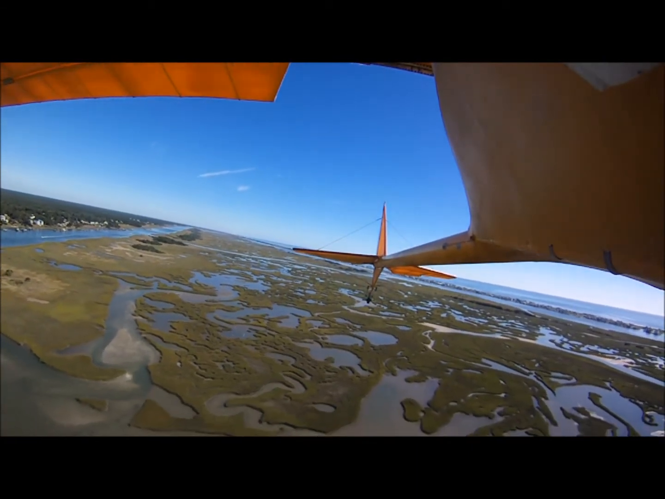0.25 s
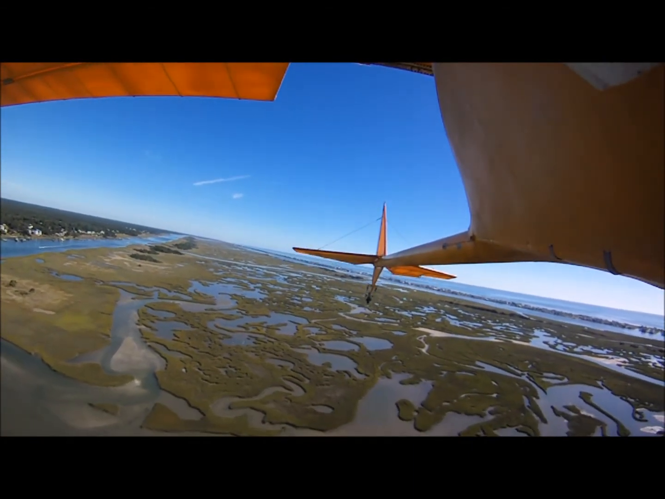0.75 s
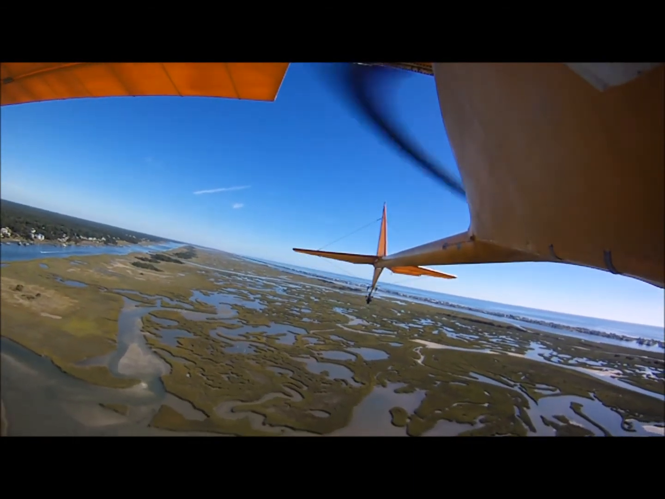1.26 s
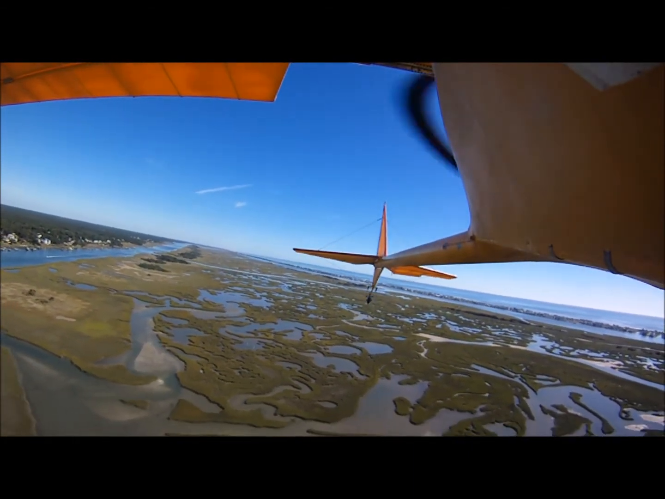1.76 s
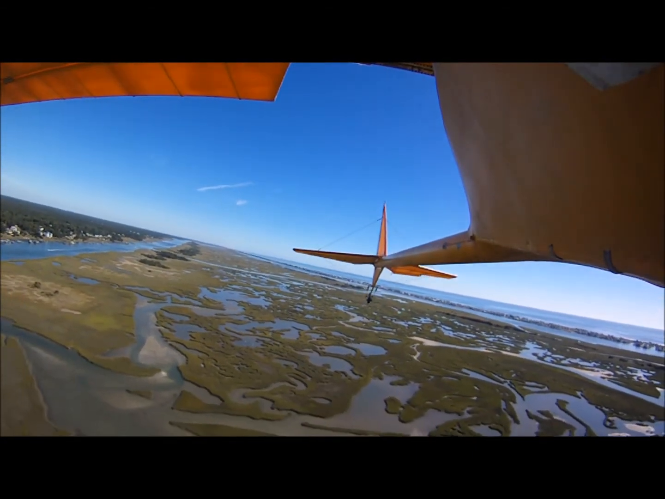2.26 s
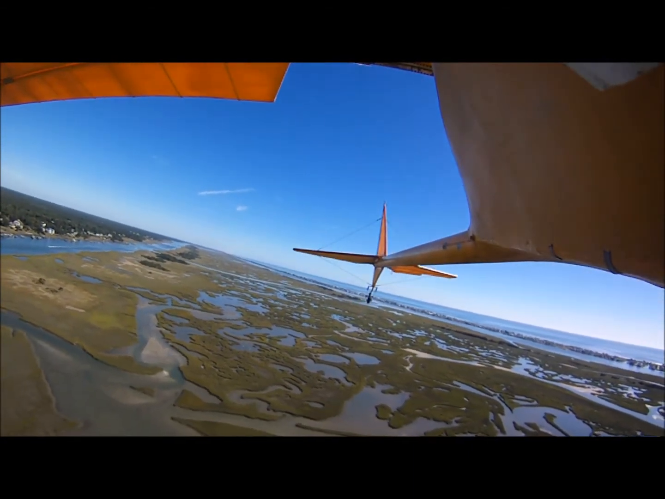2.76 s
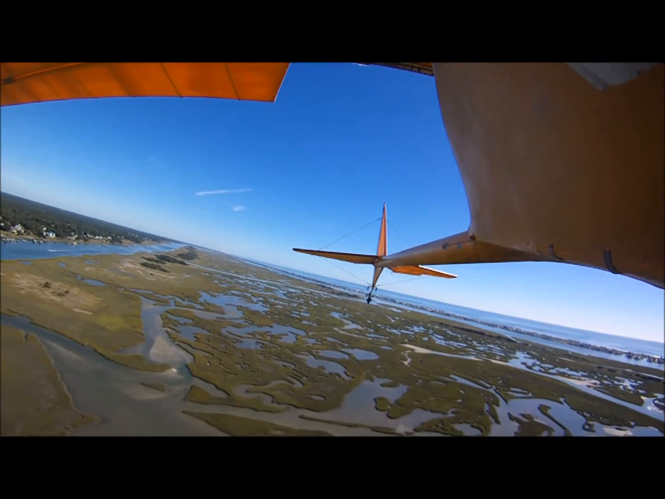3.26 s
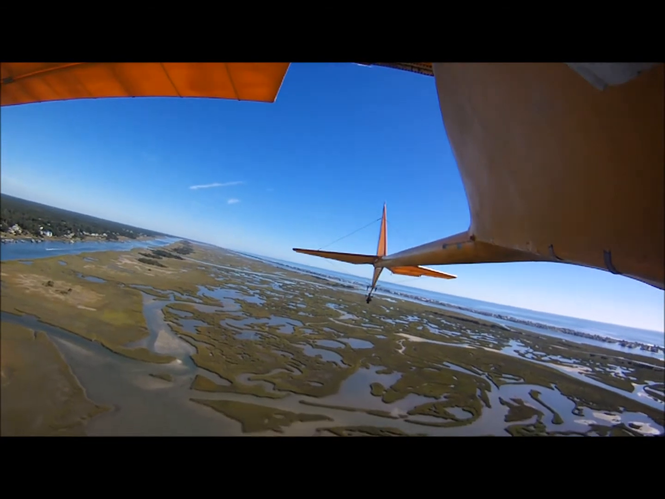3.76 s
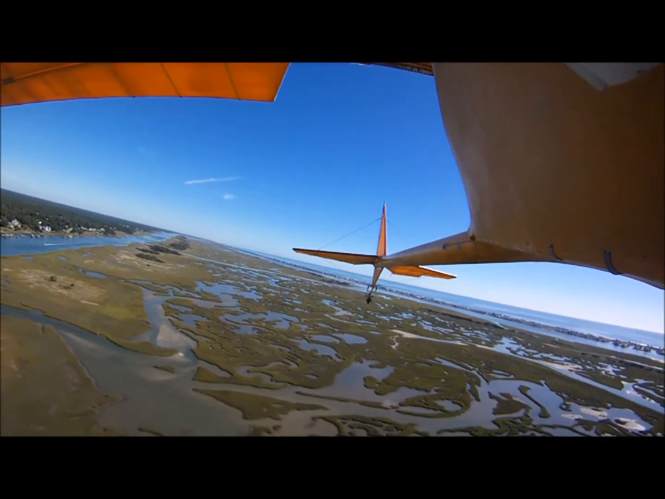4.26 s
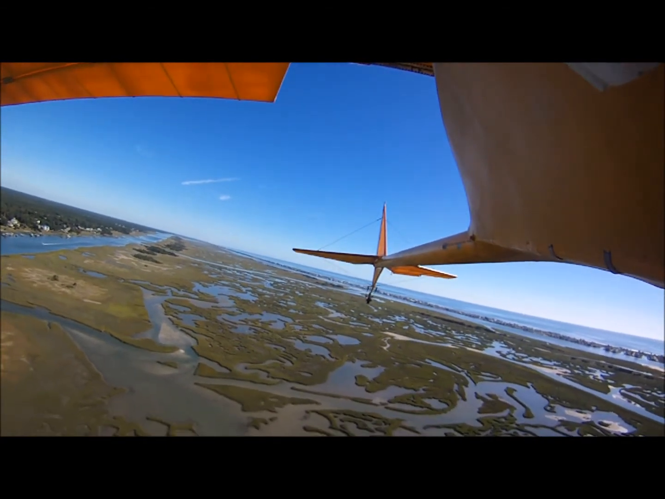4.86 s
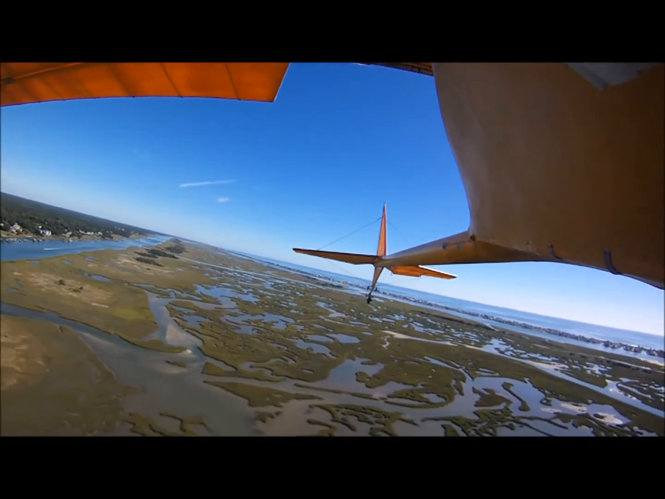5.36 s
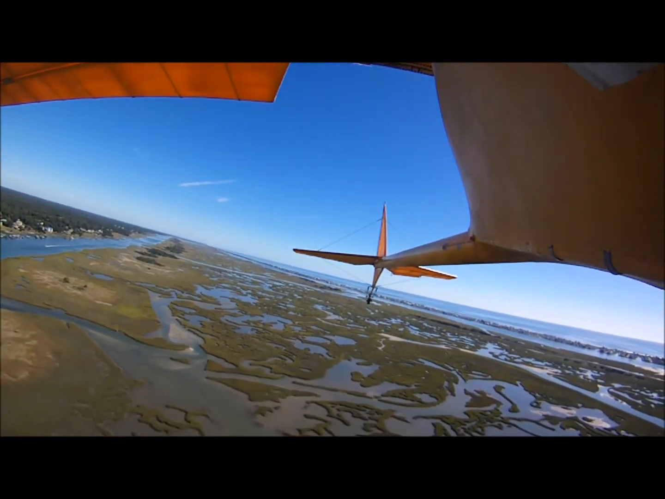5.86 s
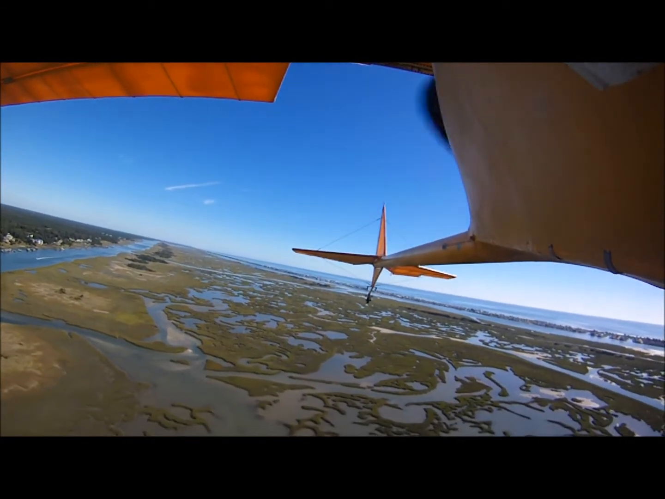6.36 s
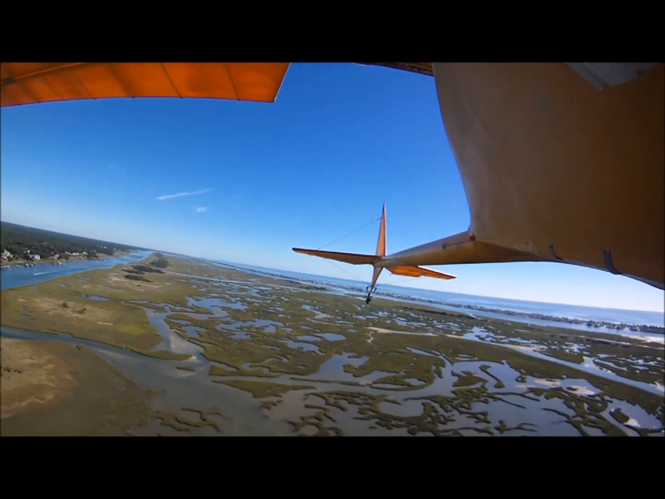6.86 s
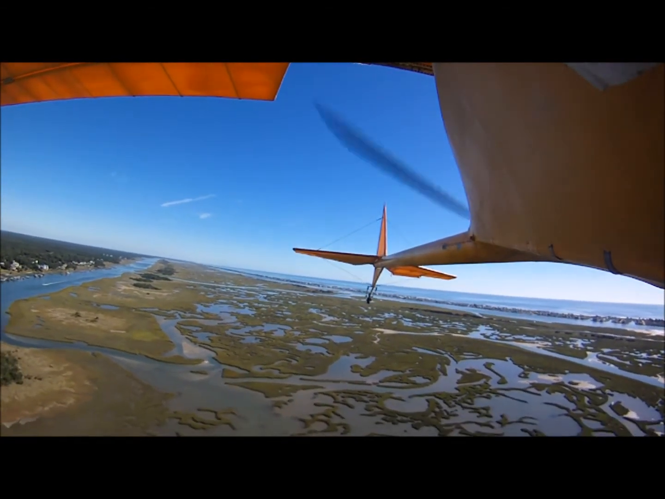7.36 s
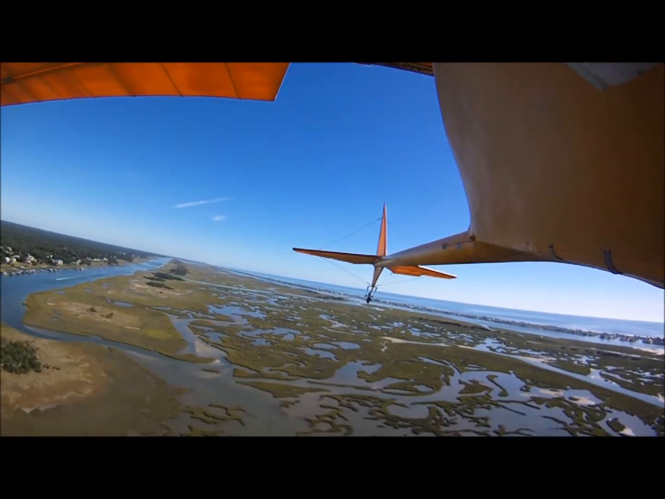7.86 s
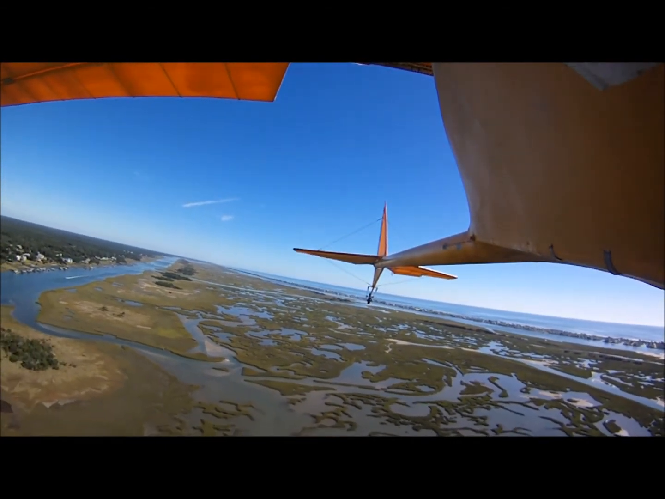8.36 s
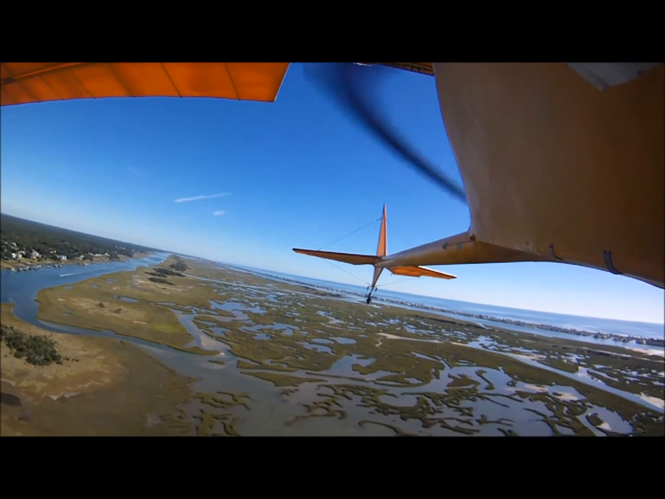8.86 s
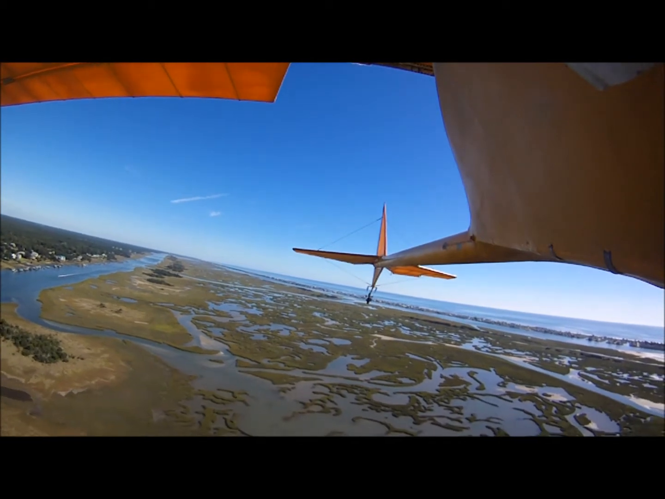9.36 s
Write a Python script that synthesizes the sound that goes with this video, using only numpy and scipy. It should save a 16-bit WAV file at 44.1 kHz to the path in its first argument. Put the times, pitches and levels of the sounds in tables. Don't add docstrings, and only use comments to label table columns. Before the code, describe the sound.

A small pusher-propeller aircraft cruises over open marshland, heard from a microphone fixed outside on the airframe, close and dry with no echo. From 0 to about 9.6 seconds the drone is continuous: about 72 blade slaps a second fuse into a low, raspy buzz, strongest around 290 to 360 hertz, beating roughly with a geared two-stroke exhaust. Its pitch wavers only minutely. An equally prominent broad slipstream roar is chopped by each blade, with a quiet, fluttering tip hiss above. Short gusts puff near 1.6, 3.15, 4.7, 5.6, 6.2, 7.2 and 8.8 seconds. Tiny dry ticks scatter throughout, clustering around 2.4 to 2.9 and 7.1 to 7.5, with sharper ones near 5.6 and 8.8. Airflow is calmest around 1 to 1.4 seconds, then gradually strengthens unevenly, peaking near 7.2 and rising again at the end. The sound stops abruptly, still in flight.

```python
import sys
import numpy as np
from scipy import signal
from scipy.fft import rfft, irfft
from scipy.io import wavfile
from scipy.ndimage import uniform_filter1d

SR = 44100
rng = np.random.default_rng(int(sys.argv[2]) if len(sys.argv) > 2 else 0)


def ratio(d):
    e = np.asarray(d, float) / 20
    return 10 ** e


def waveform_to_disk(signal):
    frames = np.transpose(np.atleast_2d(signal))
    scaled = np.clip(frames, -1, 1) * 32767
    samples = np.round(scaled).astype(np.int16)
    wavfile.write(sys.argv[1], SR, samples)


N = 424683

# (time [s], blade passes per second [Hz])
BLADE_RATE = [(0, 72.27), (.9, 72.58), (1.2, 72.36), (1.45, 71.93), (2.1, 72.4), (2.5, 72.4), (2.8, 71.96),
              (3.35, 71.7), (3.9, 72.27), (4.3, 72.73), (5.0, 72.41), (5.65, 72.57), (6.05, 72.38),
              (6.75, 72.74), (7.6, 72.81), (8.7, 72.49), (9.3, 72.63), (9.63, 72.27)]
# (time [s], change [dB])
BLADE_LOAD = [(0, 1.5), (.9, -1.5), (1.9, 1), (2.6, -3), (3.0, 1), (3.3, 1), (3.75, 1.4), (5.1, 1),
              (6.3, 2), (7.2, 1.5), (7.5, 0.5), (8.1, 1.8), (8.4, 0), (8.8, 0.5), (9.63, 1.5)]
# (multiple of the blade rate [-], rms level [dB])
SLAP_HARMONICS = [(1, -46.6), (2, -36.1), (3, -36.6), (4, -29.1), (5, -29.7), (6, -43.7), (7, -33.1),
                  (8, -34.8), (9, -42.7), (10, -43.2), (11, -44.4), (12, -39.2), (13, -45.1), (14, -39.0),
                  (15, -45.3), (16, -39.5), (17, -46.9), (18, -42.6), (19, -50.7), (20, -46.1), (21, -48.5),
                  (22, -59.3), (23, -46.5), (24, -54.8), (25, -54.8), (26, -70.0), (27, -55.5), (28, -57.7),
                  (29, -54.1), (30, -53.2), (31, -58.8), (32, -59.4)]
# (multiple of the crank rate [-], rms level [dB])
EXHAUST_HARMONICS = [(1, -57), (2, -34), (3, -53), (4, -31), (6, -39), (8, -43), (9, -50), (10, -48),
                     (12, -53), (15, -49), (16, -52)]
# (time [s], level over calm air [dB])
AIRFLOW = [(0, 0.3), (.9, -0.25), (1.43, -.3), (1.65, 0.4), (2.2, 0.4), (2.85, 1.6), (3.3, -0.1),
           (3.9, 0.65), (4.9, 1.7), (5.5, 1.7), (5.94, 1.2), (6.25, 2.5), (6.5, 1.3), (7.2, 3.5),
           (7.75, 1.9), (8.25, 2.5), (8.55, 1.25), (9.63, 3)]
# (frequency [Hz], density [dB per Hz])
ROAR_COLOUR = [(20, -31), (60, -19), (100, -5.5), (200, -3), (400, -1), (800, 0), (1500, -3), (2200, -8.5),
               (3000, -19), (4500, -33), (7000, -40), (15000, -75)]
# (time [s], rise [dB], length [s])
GUSTS = [
    (1.6, 4, 0.04),
    (3.15, 3, .04),
    (4.6, 2.5, .01),
    (4.72, 4, .03),
    (5.613, 3.5, .03),
    (6.2, 2, .05),
    (7.17, 3.5, 0.062),
    (8.82, 2.5, 0.033),
]
# (frequency [Hz], density [dB per Hz])
FIZZ_COLOUR = [(1500, -7), (3000, -2.5), (4500, 0), (7000, -9.5), (9500, -12), (11000, -17), (12500, -21),
               (13800, -19.5), (15200, -29)]
# (frequency [Hz], density [dB per Hz])
SNAP_COLOUR = [(5000, -25), (7500, -6), (9200, 4), (10500, -6), (12000, -17), (14000, -30)]
# (time [s], level at 5 kHz [dB per kHz], slope [dB per octave])
PORT_TICKS = [(1.5966, -47, -17), (1.6742, -48, -10), (2.43, -42, -12), (2.4618, -50, -18),
              (2.4675, -42.5, -20), (2.7896, -47.5, -19), (2.8036, -48, -20), (2.894, -46.5, -15),
              (2.9314, -47.5, -19), (3.3551, -48.5, -16), (4.7266, -43.5, -20), (5.6063, -39.5, -10),
              (6.0142, -47.5, -20), (6.1542, -48.5, -20), (6.1947, -46, -10), (7.1144, -45.5, -20),
              (7.1192, -47.5, -7), (7.1689, -48, -19), (7.2394, -46.5, -15), (7.3645, -47.5, -9),
              (7.4514, -46, -17), (7.5234, -43, -20), (8.1757, -46, -20), (8.1949, -45.5, -15),
              (8.2308, -48.5, -14), (8.3127, -47, -16), (8.8061, -37, -11), (9.0521, -45.5, -15),
              (9.6126, -46.5, -9)]

GEAR = 49 / 19
SLAP_TURN = .127
FIRING_TURN = .19
BODY_DB, UPPER_DB, FIZZ_DB = -29, -28.5, -52
BODY_FOLLOWS, UPPER_FOLLOWS, FIZZ_FOLLOWS = 0.89, 0.71, 0.77


def evened(x):
    return x / np.sqrt(np.mean(x ** 2) + 1e-20)


def curve(rows):
    rows = np.array(rows)
    return np.interp(np.arange(N) / SR, rows[:, 0], rows[:, 1])


def drift(top_hz, count=24):
    t = np.arange(0, N + 256, 256) / SR
    hz = top_hz * np.geomspace(1 / 20, 1, count)[:, None]
    sines = np.sin(2 * np.pi * (hz * t + rng.random((count, 1))))
    slow = (sines / np.sqrt(hz)).sum(0)
    return np.interp(np.arange(N) / SR, t, evened(slow))


def noise(colour, patchy_db, flicker_db, size):
    frames = 4 * N // size + 5
    hz = np.fft.rfftfreq(size, 1 / SR)
    real, imag, patches = rng.standard_normal((frames, len(hz), 3)).T
    patches = uniform_filter1d(patches, size=9, axis=0)
    patches = evened(uniform_filter1d(patches, size=7, axis=1))
    flicker = evened(uniform_filter1d(rng.standard_normal(frames), size=3))
    reach = 1 / (1 + (hz[:, None] / 10000) ** 4)
    point_hz, point_db = np.transpose(colour)
    colour_db = np.interp(np.log(hz + 1), np.log(point_hz), point_db, left=-90)[:, None]
    level_db = colour_db + patchy_db * patches + flicker_db * flicker * reach
    spectra = (real + 1j * imag) * ratio(level_db)
    return evened(signal.istft(spectra, nperseg=size, noverlap=3 * size // 4)[1][:N])


def shaft_harmonics(table, turns, waver_db, jitter, causal, lag, lean_db={}):
    multiples, levels_db = np.transpose(table)
    count = int(multiples.max()) + 2
    log_level = np.interp(np.arange(count + 1), multiples, levels_db) * np.log(10) / 20
    mirrored = np.r_[log_level, log_level[-2:0:-1]]
    phases = -causal * signal.hilbert(mirrored).imag[multiples.astype(int)] - lag
    turns = turns + jitter * drift(30)
    out = np.zeros(N)
    for k, db, phase in zip(multiples, levels_db, phases):
        change_db = lean_db[k] if k in lean_db else waver_db * drift(3)
        out += np.sqrt(2) * ratio(db + change_db) * np.cos(2 * np.pi * k * turns + phase)
    return out


def blade_slap(passes):
    lean_db = {}
    for k, lift_db in ((5, 0), (7, 0), (8, .3)):
        lean_db[k] = lift_db + .9 * drift(2)
    lean_db[4] = curve(BLADE_LOAD) - .5 + .9 * drift(6)
    return shaft_harmonics(SLAP_HARMONICS, passes, waver_db=1, jitter=.001, causal=1, lag=1.3, lean_db=lean_db)


def exhaust(passes):
    crank_turns = passes * GEAR / 2 + FIRING_TURN
    return shaft_harmonics(EXHAUST_HARMONICS, crank_turns, waver_db=.6, jitter=.003, causal=0, lag=.65)


def slipstream_roar(passes, chop=.2, lag=.35, puff=.1, split_hz=700):
    swell = chop * np.exp(9 * (np.cos(2 * np.pi * (passes - lag)) - 1))
    slap_puff = puff * np.exp(-((passes - .04) % 1) / .08)
    wake = 1 + swell + slap_puff
    turbulence = noise(ROAR_COLOUR, patchy_db=.5, flicker_db=0.8, size=1024)
    air = ratio(0.15 * drift(14)) * wake * turbulence
    body = signal.sosfiltfilt(signal.butter(2, split_hz, fs=SR, output="sos"), air)
    upper = air - body
    t = np.arange(N) / SR
    gust_db = sum(rise_db * np.exp(-((t - s) / length) ** 2) for s, rise_db, length in GUSTS)
    flow_db = curve(AIRFLOW)
    body_gain = ratio(BODY_DB + BODY_FOLLOWS * flow_db + gust_db)
    upper_gain = ratio(UPPER_DB + UPPER_FOLLOWS * flow_db + 0.2 * gust_db)
    return body_gain * evened(body) + upper_gain * evened(upper)


def tip_fizz(passes, snap_db=-3, early=.045, fade=.07, spread_db=1.3):
    passes = passes + early
    strengths = ratio(spread_db * rng.standard_normal(int(passes[-1]) + 2))
    strength = strengths[np.floor(passes).astype(int) + 1]
    since_snap = passes % 1
    gate = strength * (np.exp(-since_snap / fade) + 0.25 * (1 - since_snap))
    snap = ratio(snap_db) * gate * noise(SNAP_COLOUR, patchy_db=1.2, flicker_db=-1.5, size=256)
    hiss = noise(FIZZ_COLOUR, patchy_db=1.0, flicker_db=3.0, size=256)
    return ratio(FIZZ_DB + FIZZ_FOLLOWS * curve(AIRFLOW)) * (hiss + snap)


def faint_ticks(count=15, level_db=-50, slopes_db=(-20, -12)):
    odds = np.cumsum(ratio(2 * curve(AIRFLOW)))
    when, dullness = rng.random((count, 2)).T
    times = np.interp(when, odds / odds[-1], np.arange(N) / SR).clip(.01)
    slopes = np.interp(dullness, (0, 1), slopes_db)
    return [(s, level_db, slope_db) for s, slope_db in zip(times, slopes)]


def port_ticks(lead=60):
    out = np.zeros(N)
    t = np.arange(512) / SR
    hz = np.fft.rfftfreq(len(t), 1 / SR) + 1
    low_cut = 1 / np.sqrt(1 + (3000 / hz) ** 10)
    high_cut = 1 / np.sqrt(1 + (hz / 10000) ** 12)
    for s, db, slope_db in PORT_TICKS + faint_ticks():
        tail = np.exp(-t / rng.uniform(.0004, .0011))
        burst = np.roll(rng.standard_normal(len(t)) * tail, lead)
        burst[lead] = 4
        colour = low_cut * high_cut * ratio(db + 30.7 + slope_db * np.log2(hz / 5000))
        sound = irfft(rfft(burst / np.linalg.norm(burst)) * colour)
        part = out[round(s * SR) - lead - 8:][:len(t)]
        part += sound[:len(part)]
    return out


def scene():
    passes = np.cumsum(curve(BLADE_RATE)) / SR - SLAP_TURN
    engine = blade_slap(passes) + exhaust(passes)
    air = slipstream_roar(passes) + tip_fizz(passes) + port_ticks()
    return (engine + air)[None]


def low_pass(x):
    return signal.sosfilt(signal.butter(12, 15330, fs=SR, output="sos"), x)


def record(dry):
    t = np.arange(N) / SR
    opening = np.clip(np.minimum(t, t[::-1]) / .001, 0, 1)
    hz, s, spectra = signal.stft(dry * opening, SR, nperseg=1024)
    edge_hz = 14760 + 60 * curve(AIRFLOW) + 190 * drift(40)
    edge_hz = np.interp(s, t, edge_hz)
    passed = np.clip((edge_hz - hz[:, None]) / 90, 0, 1)
    mix = signal.istft(spectra * passed, SR, nperseg=1024)[1][:, :N]
    return low_pass(mix)


dry = scene()
out = record(dry)
waveform_to_disk(out)
```